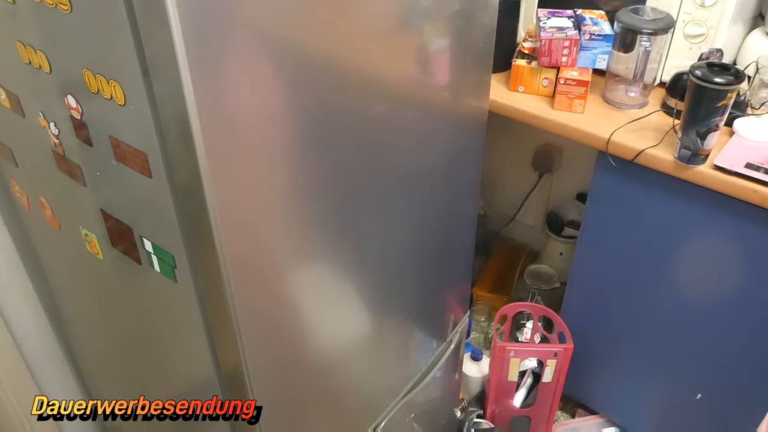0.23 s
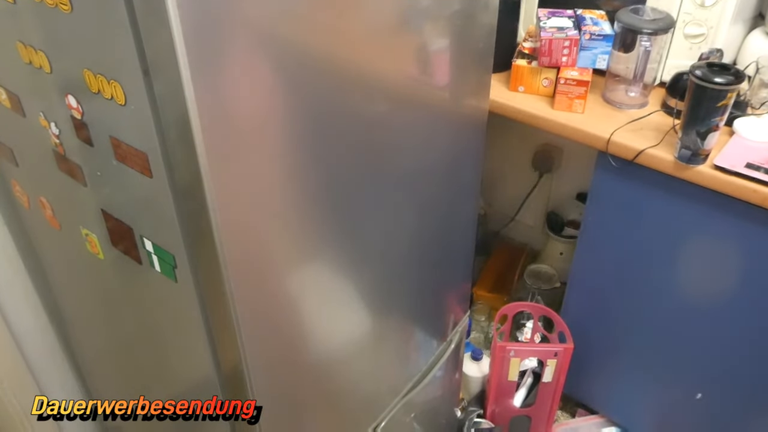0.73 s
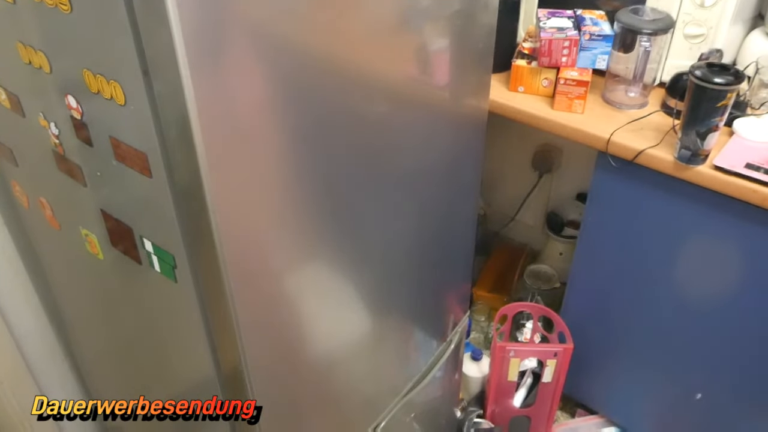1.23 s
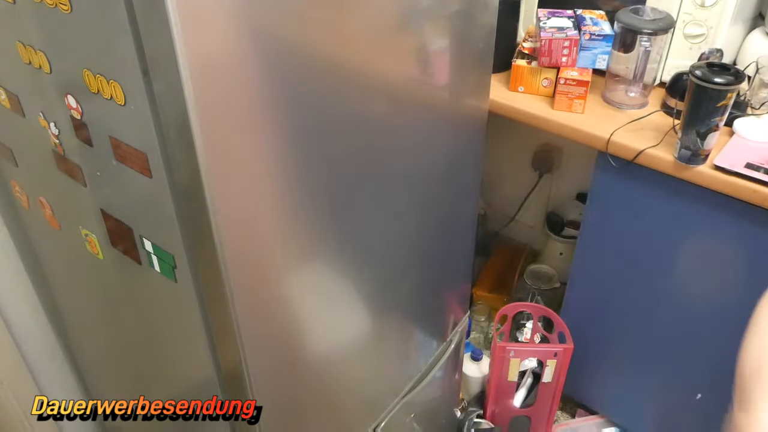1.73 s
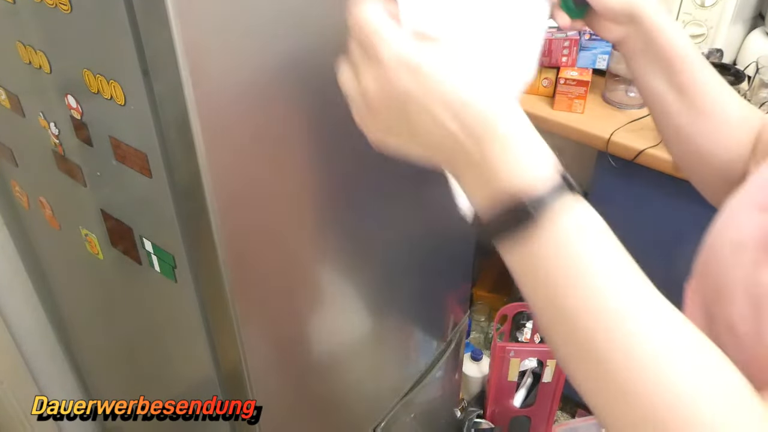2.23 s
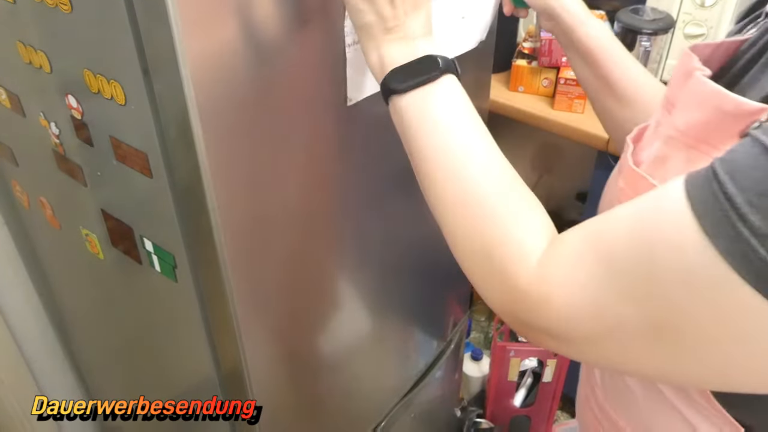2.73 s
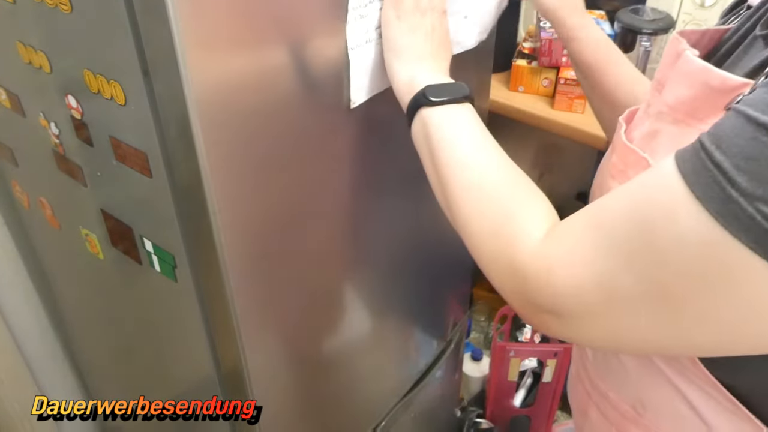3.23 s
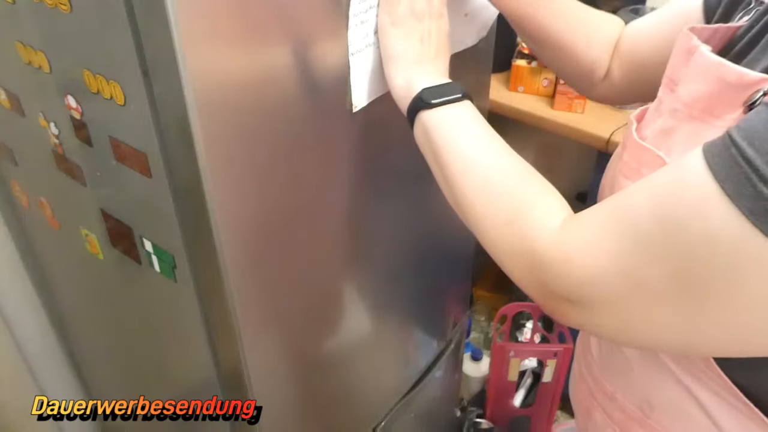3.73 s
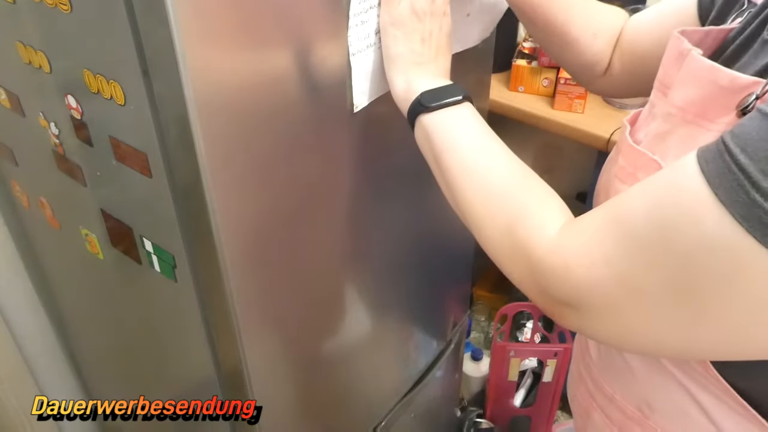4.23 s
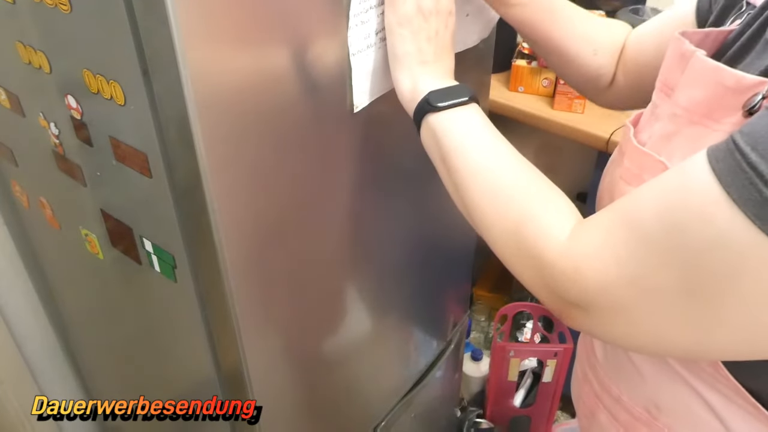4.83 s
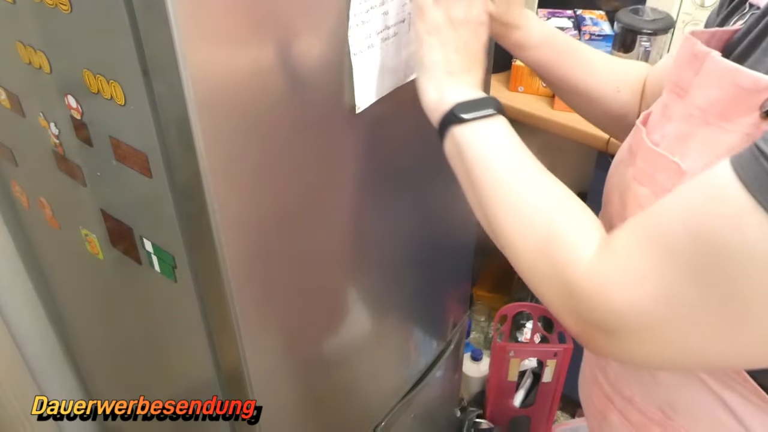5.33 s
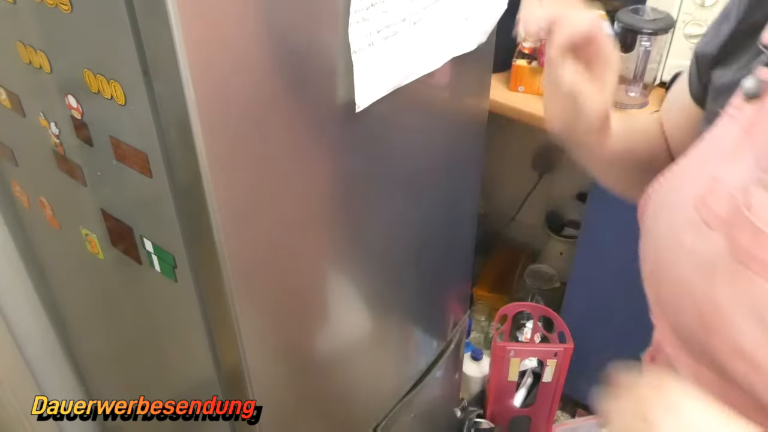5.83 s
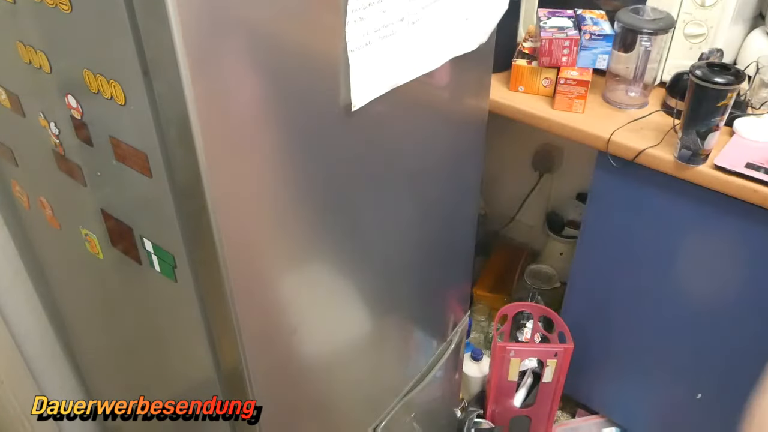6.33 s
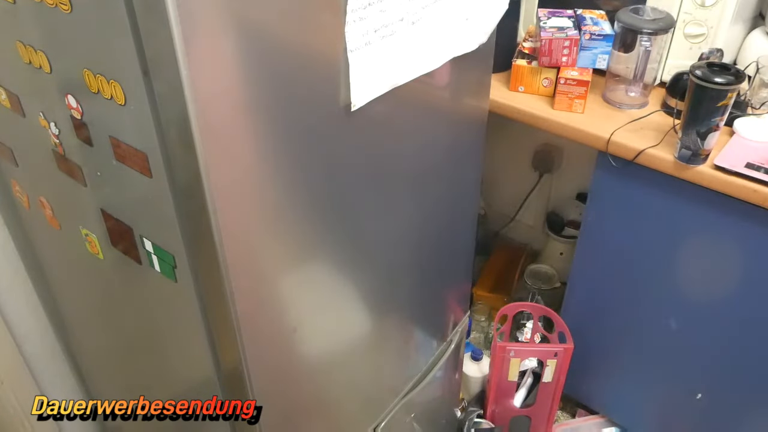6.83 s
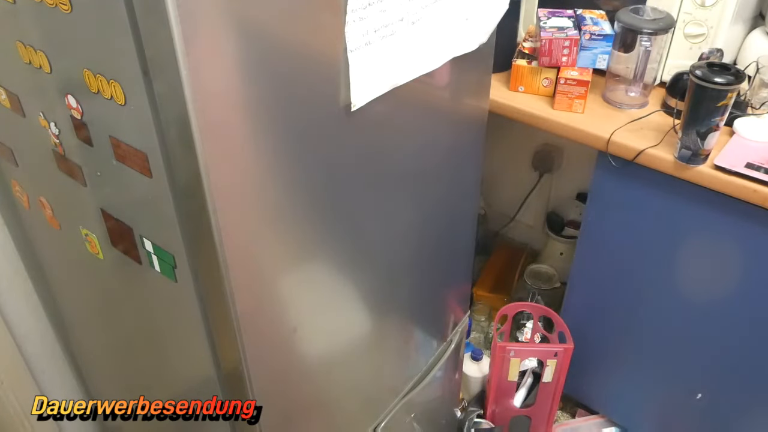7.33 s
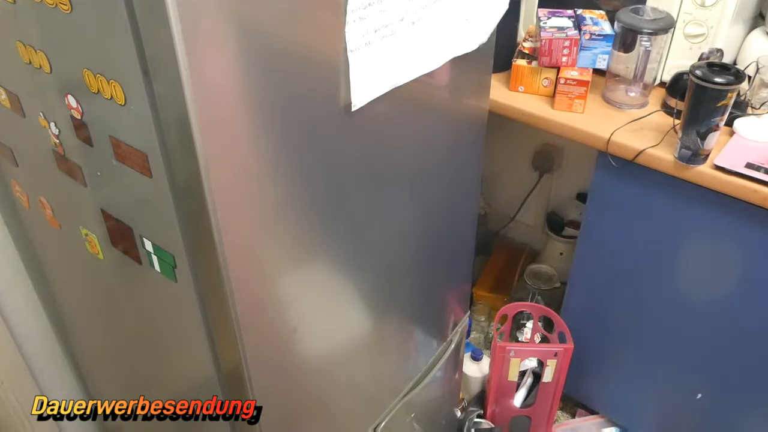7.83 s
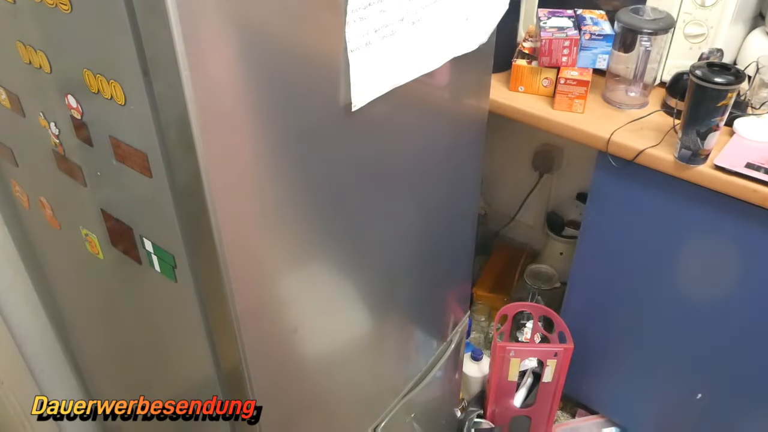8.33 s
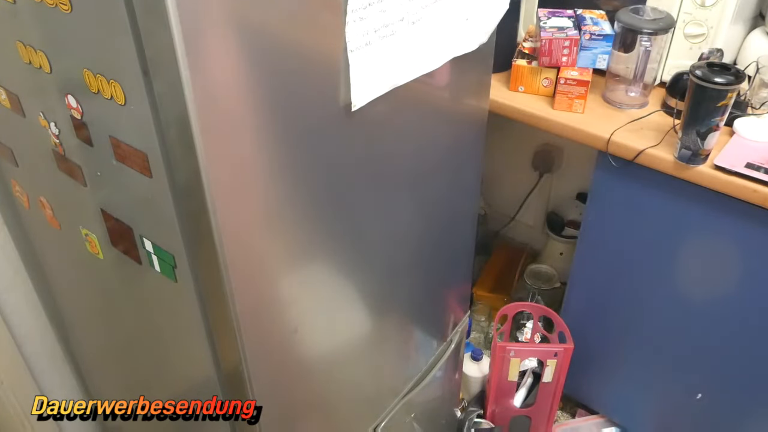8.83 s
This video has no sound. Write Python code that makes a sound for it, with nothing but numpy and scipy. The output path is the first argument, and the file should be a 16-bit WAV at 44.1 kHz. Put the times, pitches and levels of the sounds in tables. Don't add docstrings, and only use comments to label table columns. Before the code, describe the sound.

A small hard-walled kitchen, close stereo microphones, soft fridge murmur. A lid creaks and small plastic boxes knock; then paper is pressed and smoothed on the fridge door with hisses, creases and taps. A magnet snaps on, cloth rustles quietly. Finally bigger boxes bang, crash and scrape slightly to the right, a wire rack ringing, with short bright echoes.

```python
import sys
import numpy as np
from scipy import signal
from scipy.fft import rfft, irfft, next_fast_len
from scipy.io import wavfile
from scipy.ndimage import uniform_filter1d

SR = 44100
rng = np.random.default_rng(int(sys.argv[2]) if len(sys.argv) > 2 else 0)


def elevation(decibels):
    levels = np.asarray(decibels, float)
    return 10 ** (levels / 20)


def generate_wav(sig):
    pcm = np.round(np.clip(np.atleast_2d(sig).T, -1, 1) * 32767).astype(np.int16)
    wavfile.write(sys.argv[1], SR, pcm)


N = 399987

# (frequency [Hz], density [dB per Hz])
MURMUR_COLOUR = [(25, -20), (110, -14), (209, -1), (520, -5.5), (945, -14.5), (3170, -22), (10100, -24),
                 (15500, -29)]
# (frequency [Hz], side minus mid [dB])
MURMUR_WIDTH = [(60, 5), (110, 10), (200, 8.5), (700, 11), (1290, 8.5), (2380, -1), (8120, -3.5),
                (15000, -2.5)]
# (frequency [Hz], width [Hz], level [dB])
WHISTLES = [(1936, 370, -65.5), (2556, 230, -69)]
# (time [s], level [dB])
MOTOR_THRUM = [(1.0, -99), (1.2, -70), (1.4, -67), (1.55, -79), (1.7, -69.5), (1.85, -95)]

# (frequency [Hz], level [dB], t60 [s])
ROOM_MODES = [(143.7, 6.5, 0.46), (196, -9, 1), (329, -11, 0.2)]
# (frequency [Hz], t60 [s])
ROOM_T60 = [(100, 0.6), (500, 0.3), (1500, 0.35), (3000, 0.38), (6000, 0.42), (12000, 0.39)]
# (frequency [Hz], side minus mid [dB])
ROOM_WIDTH = [(60, 17), (150, -6.5), (500, -11), (1500, -9.5), (4000, -6.5), (9000, -8), (14000, -1.5)]
# (frequency [Hz], gain [dB])
NOOK_COLOUR = [(450, -2.5), (800, -0.5), (1050, 2), (1500, -1.5), (2000, -0.5), (2450, 4), (3100, -1.5),
               (5500, -2.5)]

# (frequency [Hz], density [dB per Hz])
PAPER_COLOUR = [(2650, -41), (4500, -7), (6460, -7), (6810, -5.5), (8080, -10.5), (9100, -2), (10200, -5),
                (15500, -17)]
# (firmest contact [s], length [s], hiss [dB], scrape [dB])
HAND_STROKES = [(1.775, 0.047, -51, -47), (1.86, 0.13, -58, -37), (2.0, 0.49, -55.5, -45),
                (2.2, 0.4, -59.5, -44), (2.334, .12, -56.5, -58), (2.486, 0.054, -63, -44),
                (2.576, 0.066, -61, -44), (2.72, 0.093, -55.5, -39), (2.858, 0.032, -40, -39),
                (2.988, 0.076, -48, -40.5), (3.09, 0.11, -52.5, -44), (3.165, 0.11, -47, -35.5),
                (3.266, 0.025, -60, -54), (3.348, 0.12, -50, -38.5), (3.78, 0.23, -65, -58),
                (4.19, 0.024, -60, -62), (4.29, 0.14, -64, -60), (4.53, 0.14, -58, -53),
                (4.95, .05, -72, -65), (5.09, .06, -62.5, -60), (5.325, 0.079, -57.5, -65),
                (5.52, 0.06, -68, -50), (5.67, 0.032, -54, -48), (5.8, 0.59, -61.5, -43.5),
                (6.3, 0.95, -66.5, -51.5)]
# (firmest contact [s], length [s], hiss [dB], scrape [dB])
BOX_DRAGS = [(.0, .1, -75, -59), (.12, 0.18, -78, -51), (6.99, 0.2, -50, -39), (7.216, 0.12, -54, -32),
             (7.39, 0.12, -60, -24.5), (7.59, 0.33, -51.5, -41), (7.775, 0.27, -51, -36.5),
             (7.892, 0.28, -46.5, -34.5), (8.112, 0.51, -49.5, -34), (8.315, 0.17, -39.5, -27.5),
             (8.384, 0.052, -37.5, -25), (8.598, 0.31, -60.5, -39.5), (8.772, 0.074, -63, -28.5),
             (8.884, 0.11, -54, -52), (8.992, .12, -56, -29.5), (9.06, 0.11, -52, -44)]
# (firmest contact [s], length [s], level [dB])
BOX_SHUFFLES = [(0.027, 0.15, -36.5), (0.148, 0.087, -36), (1.683, 0.2, -42), (1.83, 0.08, -36),
                (1.993, 0.064, -41.5), (2.21, 0.27, -48), (2.582, 0.16, -44.5), (2.816, 0.13, -45),
                (3.17, 0.099, -51), (4.29, 0.089, -60), (4.54, 0.22, -56), (5.24, 0.12, -59),
                (5.518, 0.12, -49), (5.774, .3, -46.5), (6.4, 0.8, -59.5), (7.5, 0.31, -43.5),
                (7.844, 0.21, -35.5), (7.977, 0.32, -38), (8.256, 0.27, -41.5), (8.375, 0.084, -26),
                (8.612, 0.35, -37), (8.776, .05, -32), (8.97, 0.09, -30)]
# (start [s], end [s], level [dB])
PALM_WIPES = [(2.71, 2.73, -60), (2.832, 2.87, -52.5), (2.96, 3.02, -52), (3.055, 3.195, -50.5),
              (3.236, 3.279, -50.5), (3.32, 3.364, -52.5), (8.3, 8.4, -53)]
# (time [s], peak [dB], centre [Hz])
PAPER_TICKS = [(2.5546, -45, 8630), (2.703, -40, 9500), (2.8654, -31, 9300), (3.8885, -31, 9000),
               (3.8885, -33, 4800), (3.896, -30, 7020), (4.1904, -53, 9740), (4.4702, -45, 8850),
               (4.9525, -37, 10200), (5.2919, -47, 8400), (5.6441, -54, 10100)]
# (time [s], level [dB])
LID_CREAK = [(.045, -80), (.06, -56), (.085, -49), (.125, -52.5), (.15, -46.5), (.185, -52.5), (.21, -75)]
# (frequency [Hz], width [Hz], level [dB])
LID_RESONANCES = [(774, 56, -3), (870, 74, -9), (1100, 73, -10), (1630, 95, -7)]
# (time [s], peak [dB], ring [Hz], t60 [s])
LID_TAPS = [(0.0011, -54, 144.7, .6), (.53, -54.5, 144, 0.6), (7.545, -43, 144, .3),
            (2.68, -45, 456, 0.054), (3.9, -40.5, 242, 0.14), (6.82, -31.5, 500, .12),
            (2.022, -40, 1700, 0.093), (7.15, -26.5, 1500, .08), (1.453, -39, 606, 0.068),
            (1.897, -38, 574, 0.055), (5.112, -46, 590, 0.03), (5.587, -51, 541, 0.22),
            (5.668, -54, 555, 0.12), (6.172, -46, 548, 0.072)]
# (time [s], peak [dB], ring [Hz], t60 [s])
METAL_SQUEAKS = [(.14, -63, 6600, .03), (.525, -61, 6600, .03), (.648, -47, 6600, .02)]
# (time [s], peak [dB], ring [Hz], t60 [s])
WIRE_RACK = [(6.6, -32, 2460, 0.18), (7.04, -32, 2460, .3), (7.14, -31, 2460, .3), (7.237, -26, 2460, 0.54),
             (7.237, -38, 4100, 0.35), (7.245, -30.5, 4400, 0.27), (7.245, -30.5, 3365, 0.5),
             (7.06, -37, 3365, .3), (6.905, -35.5, 3700, 0.18), (6.82, -29.5, 1850, 0.1),
             (8.42, -34, 3700, 0.2), (8.51, -40, 3300, .25), (9.03, -33, 2400, 0.13)]

# (frequency [Hz], level [dB], t60 [s])
SMALL_BOX_MODES = [(554, -4, .02), (1039, -6, .02), (1314, 0, .025), (1712, -4, .02), (2080, -4, .02),
                   (2713, -8, .02)]
BIG_BOX_MODES = [(783, -4.5, .05), (872, -0.5, 0.058), (995, -4, 0.064), (1092, -2.5, 0.046),
                 (1196, -0.5, 0.045), (1347, -10, .05), (1840, -0.5, 0.046), (2154, -4, 0.043),
                 (2350, -8.5, .06), (2450, -1.5, .08), (3365, -2.5, 0.13), (3740, -3, .08),
                 (4160, -10, .05), (4430, -6, .05)]
STEEL_DOOR_MODES = [(231, -2, .06), (554, -2, .04), (1039, -4, .04), (1314, 0, .08), (1400, 0, .06),
                    (1550, -4, .04), (1712, -7, .04), (1880, -6, .04), (2200, -4, .03)]

# (time [s], knock peak [dB], then hollow, thud and snap against the knock [dB])
SHELF_KNOCKS = [(0.5223, -29, -11, -21, -26), (0.542, -32, -3.5, -15, -25), (0.641, -32, -6, -23, -22),
                (0.648, -30, -4.5, -27, -22), (0.6544, -30.5, -8, -21, -24), (1.333, -53, 7, 3, -23),
                (1.3866, -27, -1, -23, -11.5), (1.3998, -31.5, -27, -35, -15),
                (1.6446, -29, -6, -24, -23.5), (1.7381, -44, 2, -9, -21), (1.767, -35, -6, -18, -24),
                (1.7727, -32, -6, -20, -24), (1.7998, -35, -1, -17, -11.5), (1.8969, -45, -3, -22, -18),
                (1.9548, -37.5, -9, -30, -26), (2.001, -35, -14, -31, -26), (2.0189, -32.5, -18, -44, -30),
                (2.262, -44, 3, -10, -26), (2.2902, -23.5, -13, -32, -25), (2.3535, -38.5, 6, -22, -23)]
DOOR_KNOCKS = [(2.0195, -29, -23, -40, -25), (2.295, -24.5, -9, -29, -20.5), (3.151, -32.5, -21, -30, -24),
               (2.552, -50, 9, -15, -17), (2.6781, -41.5, -2.5, -4, -26), (2.7581, -31.5, -17, -21.5, -25),
               (2.8955, -31, -20, -24, -25), (3.3623, -38, -21, -26, -4)]
CREASE_KNOCKS = [(2.8274, -32.5, -24, -33, -20), (2.8442, -25.5, -45, -34, -22), (2.8618, -46, 1, -20, -11),
                 (3.148, -32, -20, -34, -32), (3.345, -33.5, -19, -26, -21), (8.3025, -26, -14, -25, -7),
                 (8.313, -29, -20, -30, -10)]
MAGNET_SNAPS = [
    (3.8976, -23, -12, -29.5, -34),
    (3.9029, -23.5, -5, -30, -38),
]
BOX_BANGS = [(6.5607, -49.5, 1, -9, -4), (6.582, -38.5, -10, -20, -9), (6.593, -15.5, -12, -21, -16),
             (6.596, -12, -4, -21, -18.5), (6.6107, -14.5, -7.5, -16.5, -21), (6.62, -16.5, -5, -19, -23),
             (6.6896, -24, -5, -10, -34), (6.7494, -25.5, 3.5, -6, -34), (6.8164, -26.5, 2, -11, -6),
             (6.897, -20, -14, -20, -22), (6.903, -13, -6, -16, -22.5), (7.0076, -26.5, 0, -11, -29),
             (7.0392, -12, -6.5, -14.5, -18.5), (7.1399, -19, -2, -18, -24), (7.149, -21, -2, -20, -19),
             (7.1596, -18.5, -7, -35, -25), (7.2609, -22.5, -33, -21, -9.5)]
BOX_CRASH = [
    (7.235, -4, -10.5, -33, -16.5),
    (7.249, -20, -7, -27, -16),
]
BOX_SHOVES = [(7.5405, -32.5, -3, -6, -14), (7.6931, -38, 10, -7.5, -16), (7.8287, -35, -17, -27, -8),
              (7.8555, -39, 6, -14, -12), (7.8787, -31, -12, -32, -10), (8.0515, -27, -9.5, -30, -15.5),
              (8.1803, -32, -9, -20, -30), (8.333, -28.5, -1, -19, -18), (8.3815, -20, -3.5, -8.5, -31),
              (8.4039, -7.5, -10.5, -21.5, -16.5), (8.4169, -13, -6, -15.5, -14), (8.43, -18, -9, -21, -18),
              (8.5091, -20, -5.5, -9, -18), (8.7535, -25.5, -8.5, -19, -26),
              (8.759, -24, -4.5, -16.5, -18.5), (8.8594, -32, -5, -9.5, -14),
              (8.9441, -25, -12, -14.5, -21), (9.0133, -25, -4, -16, -20), (9.0306, -23.5, -18, -20, -35)]


def unit(x):
    return x / np.sqrt(np.mean(x ** 2))


def band(x, lo_hz, hi_hz, order=2):
    return signal.sosfilt(signal.butter(order, [lo_hz, hi_hz], "band", fs=SR, output="sos"), x)


def on_log(hz, table):
    table_hz, value = np.transpose(table)
    return np.interp(np.log(np.maximum(hz, 1)), np.log(table_hz), value)


def colour(x, table):
    size = next_fast_len(x.shape[-1])
    gain = elevation(on_log(np.fft.rfftfreq(size, 1 / SR), table))
    return irfft(rfft(x, size) * gain, size)[..., :x.shape[-1]]


def causal(db):
    cepstrum = irfft(np.log(elevation(db)))
    half = len(cepstrum) // 2
    fold = np.r_[1, 2 * np.ones(half - 1), 1, np.zeros(half - 1)]
    return np.exp(rfft(cepstrum * fold))


def walk(rate):
    hold = int(SR / rate)
    steps = np.repeat(rng.standard_normal(N // hold + 1), hold)
    return 1.8 * uniform_filter1d(uniform_filter1d(steps, hold), hold)[:N]


def grains(size, share, spread_db):
    touching = rng.random(size) < share
    return touching * rng.standard_normal(size) * elevation(spread_db * rng.exponential(size=size))


def add(out, x, s):
    i = int(s * SR)
    out[i:i + len(x)] += x[:N - i]


def spread(mid, side, pan_db, width):
    side = colour(side, width)
    return np.array([(mid + side) * elevation(pan_db / 2), (mid - side) * elevation(-pan_db / 2)])


def ringing(modes, t, detune=0.):
    hz, db, t60 = np.transpose(modes)[:, :, None]
    chance = rng.standard_normal((2, len(modes), 1))
    wave = np.sin(2 * np.pi * hz * (1 + detune * chance[0]) * t)
    decay = np.exp(-np.log(1000) * t / t60)
    return np.sum(elevation(db + 2.5 * chance[1]) * wave * decay, axis=0)


def contact(s, length, db):
    rise_share, fade_db = 0.46, 20
    power = np.full(N, 1e-12)
    for at, span, peak_db in zip(s, length, db):
        rise = rise_share * span
        t = np.arange(int(4 * span * SR)) / SR - 3 * rise
        away = np.where(t < 0, -t / rise, t / (span - rise))
        shape = elevation(2 * (peak_db - fade_db * away / 2))
        skip = max(int((3 * rise - at) * SR) + 1, 0)
        add(power, shape[skip:], at - 3 * rise + skip / SR)
    return np.sqrt(power)


def murmur():
    swell, out = walk(.7), 0
    size = next_fast_len(N)
    noise = rfft(colour(rng.standard_normal((2, size)), MURMUR_COLOUR))
    octave = np.log2(np.fft.rfftfreq(size, 1 / SR) / 30 + 1e-9)
    for k in range(10):
        overlap = np.clip(1 - np.abs(octave - k), 0, 1)
        flicker_db = .4 * swell + .6 * walk(6)
        out = out + irfft(noise * overlap, size)[:, :N] * elevation(flicker_db)
    out = unit(out) * elevation(-60.5 + 1.5)
    for hz, width, db in WHISTLES:
        whistle = band(rng.standard_normal((2, N)), hz - width / 2, hz + width / 2, order=1)
        out = out + unit(whistle) * elevation(db)
    motor_hz = 79.8 * (1 + 0.0283 * walk(5.0))
    motor_db = np.interp(np.arange(N) / SR, *np.transpose(MOTOR_THRUM))
    thrum = np.sin(2 * np.pi * np.cumsum(motor_hz) / SR) * elevation(motor_db)
    return spread(out[0] + thrum, out[1], -0.27, MURMUR_WIDTH)


def rustle():
    s, length, hiss_db, scrape_db = np.transpose([*HAND_STROKES, *BOX_DRAGS])
    mid, side = (unit(colour(grains(N, 0.62, 0.92), PAPER_COLOUR)) for _ in range(2))
    hiss = spread(mid, side, -0.27, ROOM_WIDTH) * contact(s, length, hiss_db) * elevation(1.73 * walk(40))
    scrape = unit(band(grains(N, 0.18, 2.65), 1400, 3360))
    scrape = scrape * contact(s, length, scrape_db) * elevation(-12 + 1.45 * walk(30))
    shuffle = unit(band(grains(N, .1, 0.94), 290, 1280))
    shuffle = shuffle * contact(*np.transpose(BOX_SHUFFLES)) * elevation(-10 + 4.1 * walk(20))
    return hiss, scrape + shuffle


def wipes():
    t, edge_s = np.arange(N) / SR, .008
    gate = 0
    for start, end, db in PALM_WIPES:
        gate = gate + elevation(db) * np.clip(np.minimum(t - start, end - t) / edge_s + .5, 0, 1)
    mid, side = (unit(band(grains(N, .4, 1.5), 7400, 11600)) for _ in range(2))
    return spread(mid, side, -.3, ROOM_WIDTH) * gate * elevation(1.5 * walk(60))


def ticks():
    out, t = np.zeros(N), np.arange(1024) / SR
    for s, db, hz in PAPER_TICKS:
        click = unit(band(rng.standard_normal(1024), .55 * hz, 1.4 * hz))
        add(out, elevation(db - 7.5) * click * np.exp(-t / 0.0026), s)
    return out


def creak():
    size = SR // 4
    slip, lid = grains(size, .2, 1.5), 0
    for hz, width, db in LID_RESONANCES:
        lid = lid + elevation(db) * unit(band(slip, hz - width / 2, hz + width / 2, order=1))
    twist_db = np.interp(np.arange(size) / SR, *np.transpose(LID_CREAK))
    return np.r_[lid * elevation(twist_db), np.zeros(N - size)]


def taps(events, pair):
    out, t = np.zeros(N), np.arange(16384) / SR
    for s, db, hz, t60 in events:
        modes = [(hz, db, t60), (pair * hz, db - 6, t60), (1.6 * hz, db - 12, t60 / 3)]
        add(out, ringing(modes, t), s)
    return out


def knocks(events, box, box_db, top_hz, trim_db, rattle_s):
    size = 8192
    out, t, hz = np.zeros(N), np.arange(size) / SR, np.fft.rfftfreq(size, 1 / SR)
    rattle_shape = np.exp(-t / rattle_s) * (1 - np.exp(-t / (0.16 * rattle_s)))
    softness = min(0.0036 / rattle_s, 1)
    for s, db, hollow_db, thud_db, snap_db in events:
        blow = rng.standard_normal(size) * np.exp(-t / 0.0017) * softness
        blow = blow + 0.62 * grains(size, .15, 1.37) * rattle_shape
        tone = [(90, thud_db + 0.5), (230, thud_db + 16.5), (520, (thud_db + hollow_db) / 2 + 11.0),
                (900, hollow_db + 4.0), (2200, 0), (top_hz, -5), (1.69 * top_hz, snap_db + 3.5),
                (7500, snap_db - 10.0), (10500, snap_db - 11.5), (14500, snap_db - 28)]
        uneven_db = 10 * np.log10(uniform_filter1d(np.abs(rfft(blow)) ** 2, size=60))
        walls = 1 + elevation(box_db) * rfft(ringing(box, t, 0.0147))
        sound = rfft(blow) * walls * causal(on_log(hz, tone) - uneven_db)
        knock_band = sound[(hz > 1400) & (hz < 3700)]
        knock_rms = np.sqrt(2 * np.sum(np.abs(knock_band) ** 2)) / size
        level = elevation(db + trim_db) / knock_rms * np.sqrt(0.0013 + rattle_s)
        add(out, level * irfft(sound), s)
    return out


def even(echo):
    power = np.abs(rfft(echo)) ** 2
    bumps_db = 10 * np.log10(uniform_filter1d(power, size=16) / uniform_filter1d(power, size=500))
    return irfft(rfft(echo) * causal(-bumps_db))


def kitchen(x, pan_db, wet_db, boom_db):
    size = SR // 2
    t, echoes = np.arange(size) / SR, 0
    for hz in 90 * 2. ** np.arange(8):
        octave = band(rng.standard_normal((2, size)), hz / np.sqrt(2), hz * np.sqrt(2))
        echoes = echoes + octave * np.exp(-np.log(1000) * t / on_log(hz, ROOM_T60))
    echoes = echoes * (1 - np.exp(-t / 0.00039))
    echoes = np.array([even(echo) for echo in echoes])
    echoes = echoes / np.sqrt(np.sum(echoes[0] ** 2)) * elevation(wet_db)
    echoes = echoes + elevation(boom_db) * ringing(ROOM_MODES, t) * [[1], [.3]]
    mid, side = signal.fftconvolve(x[None], echoes, axes=1)[:, :N]
    return spread(x + mid, side, pan_db, ROOM_WIDTH)


def nook(x):
    response = irfft(causal(on_log(np.fft.rfftfreq(1024, 1 / SR), NOOK_COLOUR)))
    return signal.fftconvolve(x, response)[:N]


def scene():
    hiss, scrape = rustle()
    shelf = knocks(SHELF_KNOCKS, SMALL_BOX_MODES, -71, 2800, -4.5, 0.0092)
    shelf = shelf + knocks(MAGNET_SNAPS, STEEL_DOOR_MODES, -46, 2270, -3.5, 0.0051)

    door = taps([*LID_TAPS, *METAL_SQUEAKS], 1.05)
    door = door + knocks(DOOR_KNOCKS, SMALL_BOX_MODES, -38.0, 2940, -0.98, 0.0028)
    door = door + knocks(CREASE_KNOCKS, SMALL_BOX_MODES, -60, 4040, -7.5, 0.011)
    door = door + ticks() + creak()

    boxes = knocks(BOX_BANGS, BIG_BOX_MODES, -47.5, 2900, -4.5, 0.016)
    boxes = boxes + knocks(BOX_CRASH, BIG_BOX_MODES, -48.5, 3040, -0.96, 0.005)
    boxes = boxes + knocks(BOX_SHOVES, BIG_BOX_MODES, -45.0, 2540, -4.0, 0.0096)
    door = door + taps(WIRE_RACK, 1.028)

    heard = kitchen(shelf, -1.9, 0.17, -62)
    heard = heard + kitchen(door + 0.83 * scrape, -1.9, -4.0, -75)
    heard = heard + kitchen(nook(boxes), -1.3, 0.44, -46.5)
    bass_cut = signal.butter(8, 133, "high", fs=SR, output="sos")
    return signal.sosfilt(bass_cut, heard) + hiss + wipes() + murmur()


def top_cut(x):
    return signal.sosfilt(signal.butter(12, 15450, fs=SR, output="sos"), x)


def record(dry):
    thump_gain = elevation(np.array([[-24], [-17]]))
    thump = thump_gain * band(dry ** 2, 28, 170, order=1)
    ceiling = signal.ellip(10, .2, 80, 15450, fs=SR, output="sos")
    mix = signal.sosfilt(ceiling, np.clip(dry + thump, -1, 1))
    return top_cut(mix)


dry = scene()
out = record(dry)
generate_wav(out)
```